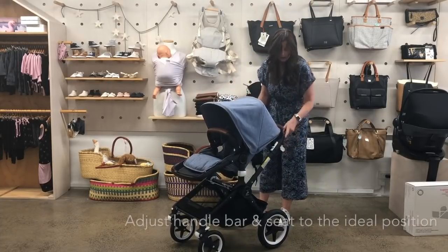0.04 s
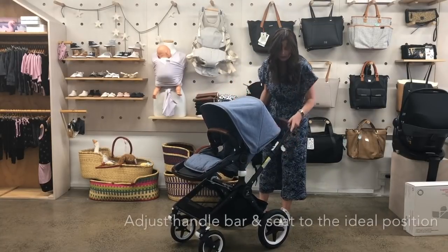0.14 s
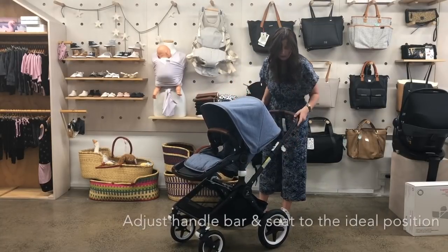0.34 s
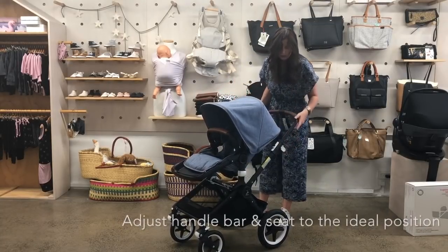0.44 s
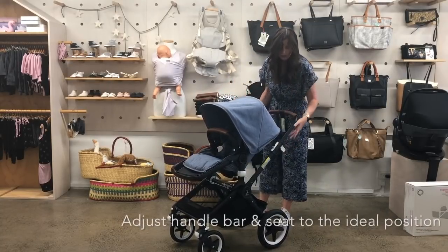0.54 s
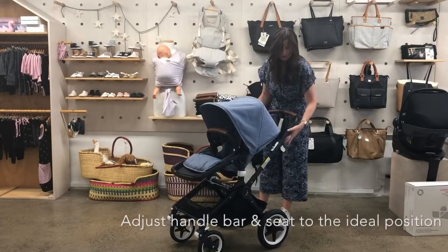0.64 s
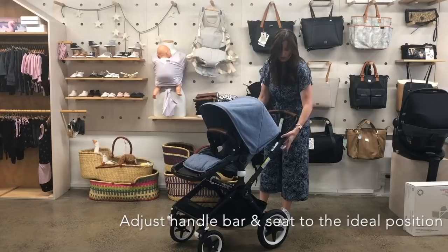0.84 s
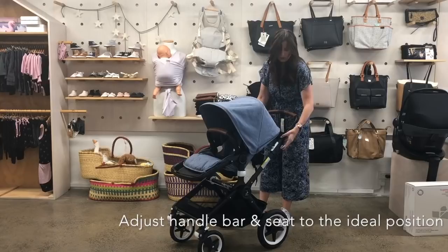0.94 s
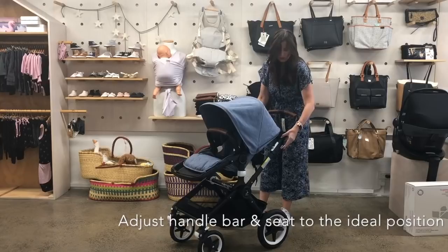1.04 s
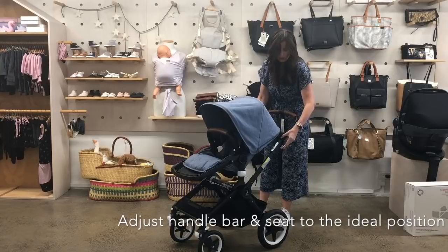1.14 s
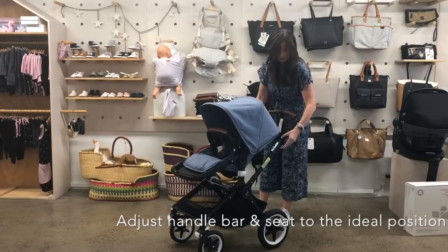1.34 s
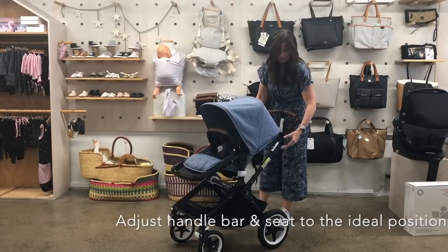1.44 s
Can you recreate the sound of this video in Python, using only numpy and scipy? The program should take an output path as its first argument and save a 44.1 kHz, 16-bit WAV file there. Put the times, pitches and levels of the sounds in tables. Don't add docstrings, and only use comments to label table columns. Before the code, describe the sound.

A stroller handle is adjusted: a faint unlatching and short slide at 0.07-0.15 s lead into a loud, bright rattle of hard clicks until 0.33, with a weaker one at 0.4 and a slight metallic ring. Quiet cloth rustle and small ticks follow from 0.58, a knock and scraping catch around 0.85-1.0, a lever tap at 1.07, and a sharp lock snap at 1.23. Short shop echo, faint air hum.

```python
import sys
import numpy as np
from scipy import signal
from scipy.fft import irfft
from scipy.io import wavfile
from scipy.ndimage import uniform_filter1d

SR = 44100
rng = np.random.default_rng(int(sys.argv[2]) if len(sys.argv) > 2 else 0)


def volts(x):
    e = np.asarray(x, float) / 20
    return 10 ** e


def master(y):
    cut = np.clip(np.atleast_2d(y).T, -1, 1)
    pcm = np.round(cut * 32767)
    wavfile.write(sys.argv[1], SR, pcm.astype(np.int16))


N = 66150

# f/Hz, level/dB per Hz
AIR = [(25, -26), (70, -11.5), (170, -1.5), (400, -9.5), (1200, -11.5), (2050, -11.5), (2650, -21),
       (16000, -34.5)]
AIR_DB = -59
# f/Hz, width/Hz, level/dB
RUMBLE = [(55, 5.2, -63), (100.6, 4.6, -67.5), (119, 8, -73)]
# t/s, level/dB
HUM = [(0, -70.5), (.8, -68), (.95, -59.5), (1.2, -62), (1.4, -62.5), (1.5, -56)]
HUM_HZ, HUM_WIDTH_HZ = 168, 8

# t/s, level/dB
SLIDE = [(.05, -93), (.07, -67.5), (.096, -56), (.101, -50), (.14, -47.5), (.15, -79), (.17, -120)]
# f/Hz, level/dB
SLIDE_COLOUR = [(900, -16), (1500, -12.5), (5300, -12), (16000, -14)]
SLIDE_HZ, SLIDE_WIDTH_HZ, SLIDE_RING_DB = 6900, 600, -3
# t/s, level/dB
RUSTLE = [(.5, -100), (.6, -63), (.7, -64.5), (.74, -85), (.79, -69), (.84, -57.5), (1.02, -71),
          (1.06, -71.5), (1.5, -74)]
# t/s, level/dB
SCRAPE = [(.86, -110), (.885, -59), (.92, -56.5), (.96, -59.5), (1.0, -58), (1.04, -81), (1.07, -110)]
# f/Hz, width/Hz, level/dB
SCRAPE_RINGS = [(4270, 740, 0), (8370, 610, -2)]

# t/s, peak level/dB, rise/s, chatter/s, tilt/dB per octave
KNOCKS = [
    (.072, -41.5, .0006, .002, -7),
    (.858, -33.5, 0.00084, .001, -2.5),
    (.993, -40.5, 0.0023, 0.0036, -7),
    (1.238, -36, 0.0027, 0.0075, -2.5),
]
# t/s, peak level/dB, rise/s, chatter/s, tilt/dB per octave
DETENTS = [
    (0.1483, -7, 0.0034, 0.0013, -2.5),
    (.1892, -2, 0.00064, 0.0017, 1.5),
    (0.2235, -0.5, 0.0021, 0.0026, 0.4),
    (0.2565, 1, 0.0013, 0.0011, 1.2),
    (.2866, 0, 0.0043, 0.002, 2.5),
    (0.322, -5, 0.0027, 0.0026, -1.43),
    (.396, -13.5, 0.0011, 0.00088, -3),
]
# t/s, peak level/dB, rise/s, chatter/s, tilt/dB per octave
REBOUNDS = [(0.145, -28, .0012, 0.0014, -2), (.151, -7.5, .0004, 0.0016, 0.5),
            (0.1556, -11.5, .0003, 0.00054, 2), (.193, -9, .0008, .002, -2.5),
            (0.197, -10.5, 0.00037, 0.0014, 0), (0.2273, -8, 0.0005, .001, 7),
            (0.2316, -13, .0005, .001, 9), (.253, 0, 0.00092, 0.0018, 1), (.259, -6, 0.000503, 0.002, 4),
            (.2625, -9.5, 0.00028, 0.0014, -4), (.2885, -5, 0.00047, 0.0012, 0),
            (0.2929, -6.5, 0.00021, .0004, -0.5), (.298, -8, 0.00045, .001, 2),
            (0.3268, -4, 0.00047, 0.00078, 0.5), (0.328, -16, 0.0005, 0.00075, 6)]
# t/s, peak level/dB, rise/s, chatter/s, tilt/dB per octave
TICKS = [(.578, -46, .002, 0.0059, 13), (.598, -37.5, 0.0062, 0.0097, 5), (.669, -64, 0.0022, 0.00081, 5),
         (.686, -66, 0.0019, 0.0012, 4.5), (.698, -54, 0.0012, .003, -5.5),
         (0.778, -51, 0.00078, 0.0025, 4), (0.8409, -31, 0.0005, 0.0017, 6.5),
         (.8445, -34, 0.00022, 0.0012, 4.5), (0.8837, -30.5, 0.00079, 0.0019, 2.5),
         (0.915, -33.5, 0.0017, 0.0045, -2), (0.9642, -35, 0.0013, 0.0027, -1.5),
         (1.012, -63, 0.00052, 0.0012, 9)]
# t/s, peak level/dB, rise/s, chatter/s, tilt/dB per octave
CATCH = [
    (.979, -28.5, .0002, 0.0011, 0.5),
]
# t/s, peak level/dB, rise/s, chatter/s, tilt/dB per octave
LEVER = [
    (1.0709, -28, 0.0012, 0.0046, 0),
    (1.0767, -31.5, .0004, 0.0014, -2),
]
# t/s, peak level/dB, rise/s, chatter/s, tilt/dB per octave
LOCK = [
    (1.2255, -10, 0.00034, 0.0002, -2.5),
    (1.2268, -10.5, 0.00032, 0.00036, 15),
    (1.2282, -10, 0.0004, 0.00021, -3),
    (1.2306, -13, 0.00016, 0.00037, -1),
    (1.2338, -11, 0.00026, 0.00037, 0.5),
    (1.2367, -16.5, 0.00038, 0.0003, 6.5),
    (1.2381, -14, 0.00027, 0.00032, 10),
]

# f/Hz, level/dB
KNOCK_CRACK = [(150, -30), (500, -23.5), (950, -5), (2200, -10.5), (3000, -7.5), (16000, -41)]
DETENT_CRACK = [(100, -41), (400, -36.5), (900, -17), (2000, -12.5), (3100, -10), (4000, -5.5),
                (10500, -0.5), (16000, -7.5)]
TICK_CRACK = [(300, -44), (2000, -10.5), (4200, -2), (6500, -3), (8500, 3.5), (10000, 5), (12500, -4.5),
              (16000, -11.5)]
CATCH_CRACK = [(200, -30), (700, -15), (2000, -11), (3150, 2), (4400, -7), (6500, -11), (10000, -16),
               (16000, -26)]
LEVER_CRACK = [(200, -15), (700, -21), (1600, -4), (3500, -4), (6200, -6.5), (9000, -11), (16000, -43)]
LOCK_CRACK = [(150, -48), (500, -38), (1000, -25), (2000, -13), (3050, 5), (5250, -8), (7300, 0),
              (16000, -9)]
# f/Hz, level/dB, t60/s
KNOCK_MODES = [(650, -12, .03), (930, 0, .015), (2140, -4, .012)]
DETENT_MODES = [(3825, 2.5, .012), (4270, -2.5, .008), (6600, -1.5, 0.0094), (7040, 10.5, 0.0202),
                (8600, 6, .01), (9360, 14, .0035), (11000, 11.5, .003)]
TICK_MODES = [(2060, -10, 0.019), (4170, -6.5, 0.03), (8200, -27, .015), (8780, 0.5, 0.016),
              (9800, -7, 0.0053)]
CATCH_MODES = [(3050, -3, .008), (3230, -1, .009), (4300, -16, .005)]
LEVER_MODES = [(2050, -21, 0.014), (4140, -7, 0.0014), (6260, -9, 0.0042)]
LOCK_MODES = [(660, -24, .05), (2900, 3, .005), (3240, 1, .005), (4700, -8, .004), (7000, 0, .005),
              (7500, 1, .006), (8460, -1, .004), (11000, -5, .002)]

RING_DB = (-10, -6, -3, -11.5, -4, 0, -9.5)
BLOW_DB = (1.7, 6, 13, 4.9, 14, 15, 4)
ECHO_DB = (-2.5, -2, -5.5, -0.5, -7.5, -5, -7)
ROOM_DB = (-0.5, 0.8, -0.5, 0.5, -2.5, -4.5, -12)
DETUNE = 0.03

# f/Hz, level/dB, t60/s
TUBE = [(1975, -44, .14), (2060, -49, .1), (3690, -38, .13), (3810, -39, .13), (4440, -41, .08),
        (6500, -38, .06), (8370, -36, .1), (8575, -34, .14)]
LAST_RING_DB = 11
WOBBLE_RAD, WOBBLE_S = 1.3, 0.012

# t/s, level/dB
EARLY = [(.0014, 2), (.003, -0.5), (.0044, -5.5), (.0052, 0), (.0072, -10.5), (.0082, -2), (.0105, -36),
         (0.014, -12.5), (0.015, -12), (0.0215, -9.5), (.029, -9)]
SMEAR_S, SMEAR_GROWTH = 0.0007, 0.12
# f/Hz, t60/s
SHOP = [(300, 0.85), (790, 0.47), (2090, 0.64), (5510, 0.59), (10000, 0.39), (16000, 0.26)]
TAIL_DB, TAIL_RISE_S = 2.5, 0.005
LOW_CUT_HZ, EDGE_HZ, LIMIT = 59, 15900, 0.83


def evened(x):
    return x / np.sqrt(np.mean(x ** 2) + 1e-20)


def read(points, hz):
    f, value = np.transpose(points)
    return np.interp(np.log(hz + 1), np.log(f + 1), value)


def curve(points):
    s, db = np.transpose(points)
    return volts(np.interp(np.arange(N) / SR, s, db))


def causal(points):
    log_gain = np.log(volts(read(points, abs(np.fft.fftfreq(4096, 1 / SR)))))
    h = np.fft.ifft(np.exp(np.conj(signal.hilbert(log_gain)))).real[:2048]
    return h / np.linalg.norm(h)


def resonate(x, hz, width):
    r = np.exp(-np.pi * width / SR)
    return signal.lfilter([1 - r * r], [1, -2 * r * np.cos(2 * np.pi * hz / SR), r * r], x)


def add(mix, at, sound):
    mix[at:at + len(sound)] += sound


def friction():
    return rng.standard_normal(N) * volts(3.2 * np.minimum(rng.exponential(1, N), 3.5))


def air():
    frames, hz = N // 256 + 5, np.fft.rfftfreq(1024, 1 / SR)
    real, imag, patches = rng.standard_normal((frames, 513, 3)).T
    patches = uniform_filter1d(patches, size=12, axis=0)
    patches = evened(uniform_filter1d(patches, size=14, axis=1))
    z = (real + 1j * imag) * volts(read(AIR, hz)[:, None] + 2.1 * patches)
    vent = evened(signal.istft(z, nperseg=1024, noverlap=768)[1][:N])
    hum = evened(resonate(rng.standard_normal(N), HUM_HZ, HUM_WIDTH_HZ))
    rumble = sum(volts(db) * evened(resonate(rng.standard_normal(N), f, width)) for f, width, db in RUMBLE)
    return rumble + volts(AIR_DB) * vent + curve(HUM) * hum


def slide():
    grit = friction()
    hiss = evened(signal.oaconvolve(grit, causal(SLIDE_COLOUR))[:N])
    ring = evened(resonate(grit, SLIDE_HZ, SLIDE_WIDTH_HZ))
    cloth = np.diff(hiss, prepend=0)
    return curve(RUSTLE) * cloth + curve(SLIDE) * (hiss + volts(SLIDE_RING_DB) * ring)


def echoes(level_db, grains):
    early = np.zeros(2600)
    direct = (0.00061, -level_db)
    for (s, db), grain in zip([direct] + EARLY, grains):
        lag_s = np.interp(np.linspace(0, 23, 257), np.arange(24), grain) * (SMEAR_S + SMEAR_GROWTH * s)
        phase = 2 * np.pi * np.cumsum(lag_s) * SR / 512
        add(early, round(s * SR), volts(db + level_db) * irfft(np.exp(-1j * phase)))
    return early


def part(hits, crack, modes, ring_db, blow_db, echo_db, room_db):
    grains_per_s, spread_db = 9000, 6.5
    t, after = np.arange(-400, 1600) / SR, np.arange(4000) / SR
    near, blows = out = np.zeros((2, N + 9000))
    draws = rng.random((len(hits), 4, len(t)))
    scatter = rng.random((len(hits), len(EARLY) + 1, 24))
    for (s, db, rise, chatter, tilt_db), (u, e, sign, off), place in zip(hits, draws, scatter):
        growth, decay = np.exp(-(t / max(rise, 1e-4)) ** 2), np.exp(-t / max(chatter, 1e-4))
        grains = (u < grains_per_s / SR) * volts(-spread_db * np.log(e + 0.014)) * np.sign(sign - 0.5)
        grains[400] = volts(blow_db)
        impacts = np.where(t < 0, growth, decay) * grains

        ring = np.zeros(len(after))
        for (hz, mode_db, t60), o in zip(modes, off):
            tone = np.sin(2 * np.pi * hz * (1 + DETUNE * (2 * o - 1)) * after)
            ring += volts(mode_db - 60 * after / t60) * tone / np.sqrt(t60)
        body = volts(ring_db) * ring / np.linalg.norm(ring)
        body[:2048] += causal([(hz, d + tilt_db * np.log2(hz / 4000)) for hz, d in crack])

        at = round(s * SR)
        burst = signal.fftconvolve(impacts / np.linalg.norm(impacts), body)
        add(near, at - 400, volts(db) * signal.fftconvolve(burst, echoes(echo_db, place)))
        add(blows, at, volts(db + room_db) * body)
    return out[:, :N]


def tube():
    t, out = np.arange(SR // 2) / SR, np.zeros(N + SR)
    for (s, hit_db, *_), phases in zip(DETENTS, rng.random((len(DETENTS), len(TUBE)))):
        drift = rng.standard_normal((len(TUBE), len(t)))
        drift = uniform_filter1d(drift, size=round(WOBBLE_S * SR), axis=1)
        wobble = WOBBLE_RAD * evened(drift)
        ring = sum(volts(db - 60 * t / t60) * np.sin(2 * np.pi * (hz * t + p) + w)
                   for (hz, db, t60), p, w in zip(TUBE, phases, wobble))
        level_db = hit_db + LAST_RING_DB * (s == DETENTS[-1][0])
        add(out, round(s * SR), volts(level_db) * ring * np.minimum(t / 0.0017, 1))
    return out[:N]


def shop(near, blows):
    taps = np.zeros((3, SR))
    at = np.arange(0, SR - 10, 10) + rng.integers(0, 10, (3, SR // 10 - 1))
    np.put_along_axis(taps, at, rng.choice([-1., 1.], at.shape), 1)
    hz, t, z = signal.stft(taps, SR, nperseg=256)
    decay = volts(-60 * t / read(SHOP, hz)[:, None])
    tail = signal.istft(z * decay, SR, nperseg=256)[1][:, :SR]
    tail = tail * (1 - np.exp(-(np.arange(SR) / SR / TAIL_RISE_S) ** 2))
    cycle = 9 * np.arange(N) / SR + np.arange(3)[:, None] / 3
    turn = np.cos(2 * np.pi * cycle) * np.sqrt(2 / 3)
    late = signal.fftconvolve(blows * turn, tail / np.linalg.norm(tail[0]), axes=1).sum(0)[:N]
    return near + volts(TAIL_DB) * late


def scrape():
    grit = friction()
    return curve(SCRAPE) * sum(volts(db) * evened(resonate(grit, hz, width)) for hz, width, db in SCRAPE_RINGS)


def scene():
    parts = zip((DETENTS, TICKS, KNOCKS, LEVER, LOCK, CATCH, REBOUNDS),
                (DETENT_CRACK, TICK_CRACK, KNOCK_CRACK, LEVER_CRACK, LOCK_CRACK, CATCH_CRACK, DETENT_CRACK),
                (DETENT_MODES, TICK_MODES, KNOCK_MODES, LEVER_MODES, LOCK_MODES, CATCH_MODES, DETENT_MODES),
                RING_DB, BLOW_DB, ECHO_DB, ROOM_DB)
    near, blows = volts(7) * sum(part(*p) for p in parts)
    rub, ring = slide() + scrape(), tube()
    near = near + volts(-0.1) * rub + volts(4.0) * ring
    blows = blows + volts(-9.5) * rub + ring
    return (shop(near, blows) + air())[None]


def roll_off(x):
    return signal.sosfilt(signal.butter(12, 17150, fs=SR, output="sos"), x)


def record(dry):
    low_cut = signal.butter(4, LOW_CUT_HZ, "high", fs=SR, output="sos")
    x = LIMIT * np.tanh(signal.sosfilt(low_cut, dry) / LIMIT)
    edge = signal.firwin(511, EDGE_HZ, window=("kaiser", 9), fs=SR)
    x = signal.oaconvolve(x, edge[None], "same")
    return roll_off(x)


dry = scene()
out = record(dry)
master(out)
```